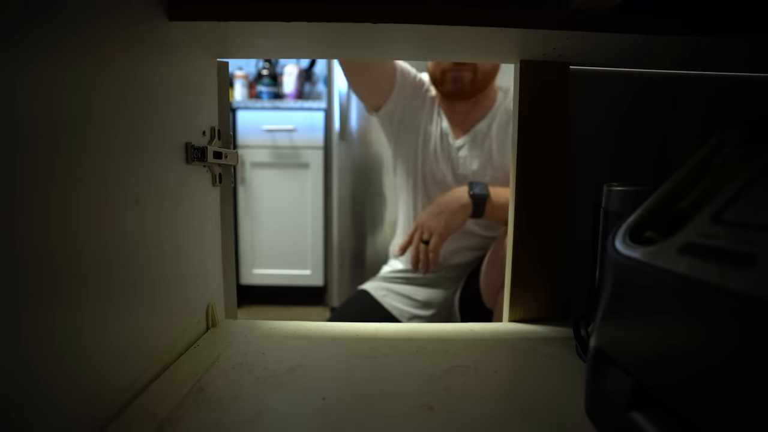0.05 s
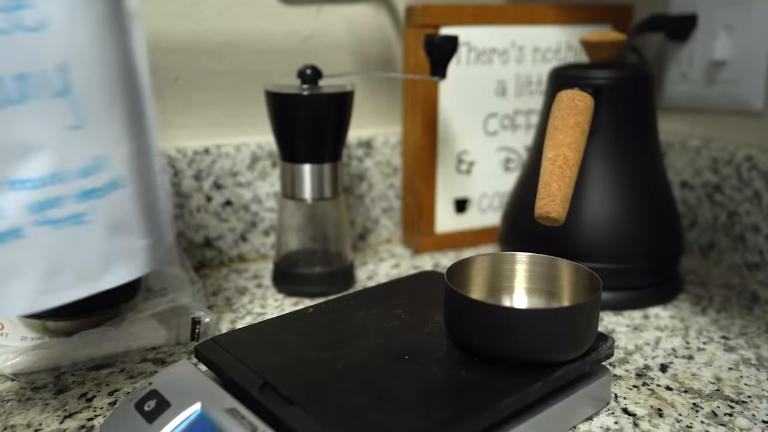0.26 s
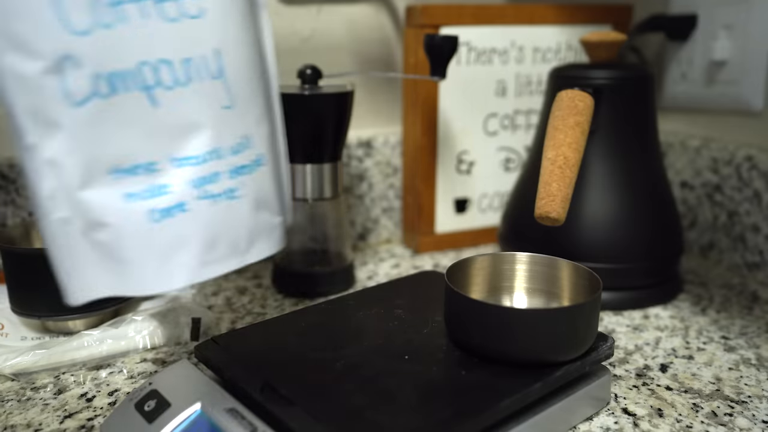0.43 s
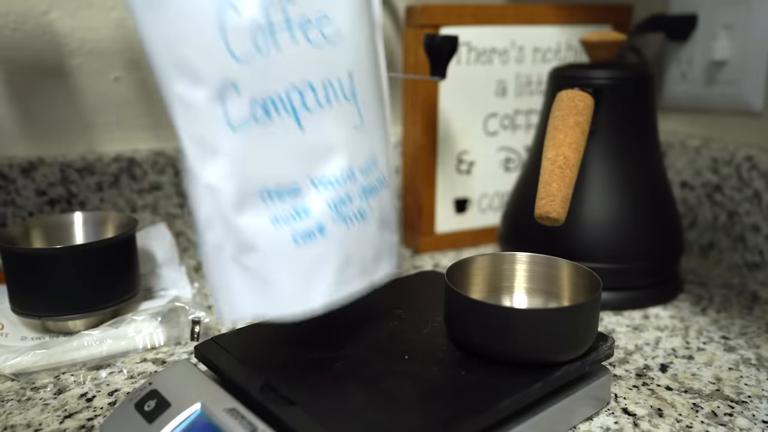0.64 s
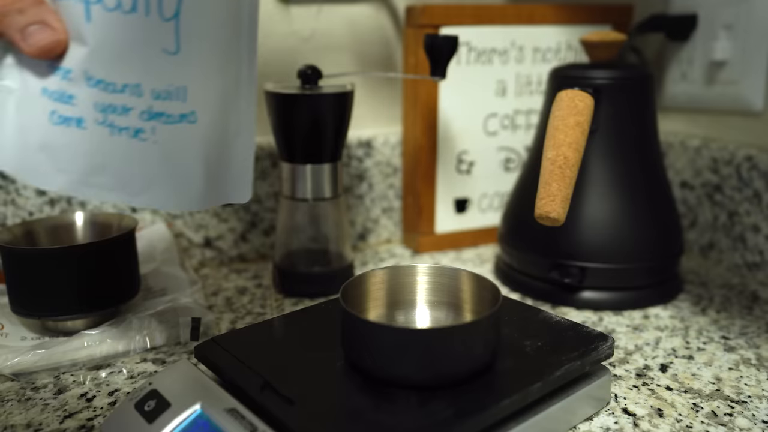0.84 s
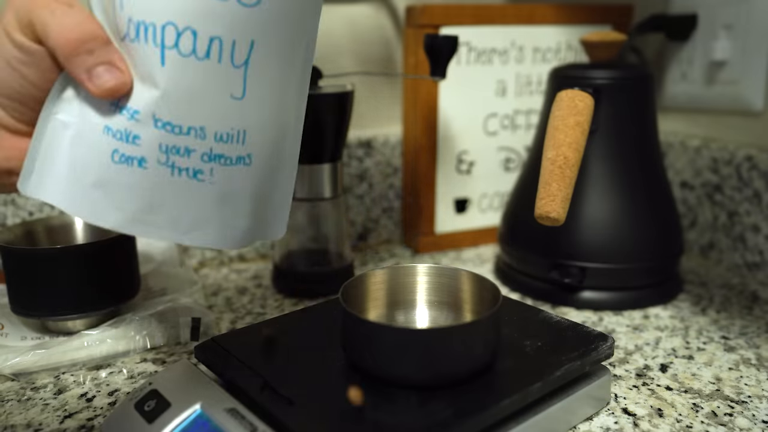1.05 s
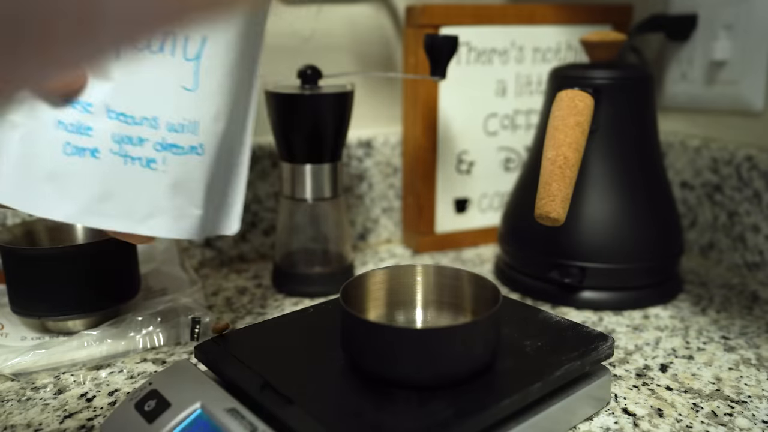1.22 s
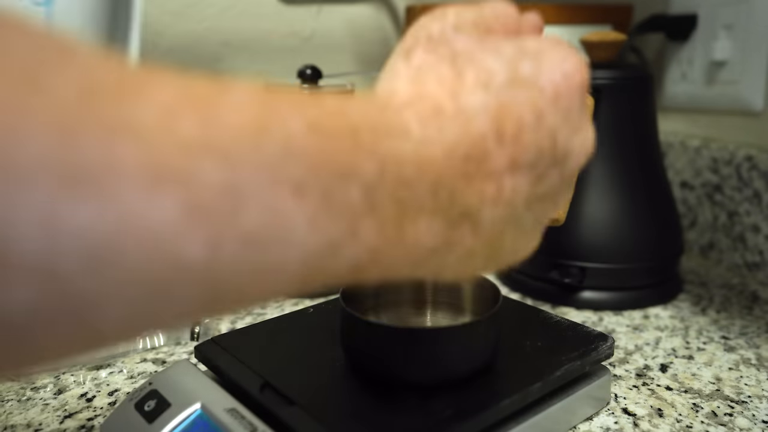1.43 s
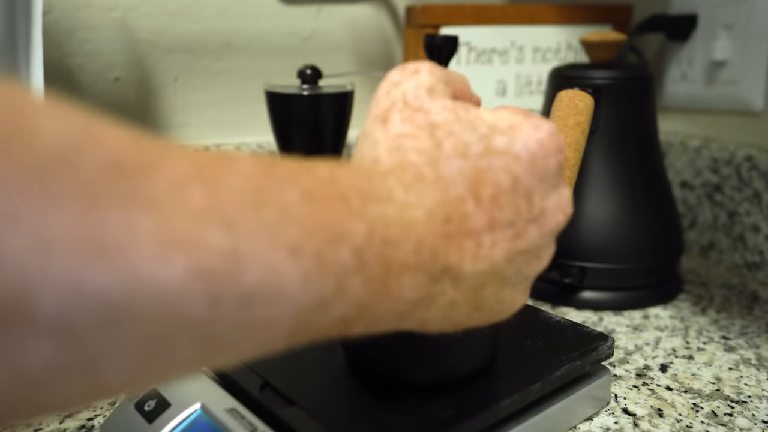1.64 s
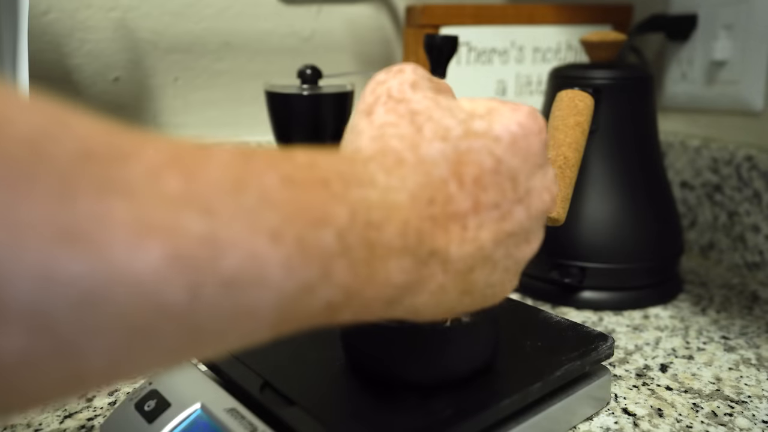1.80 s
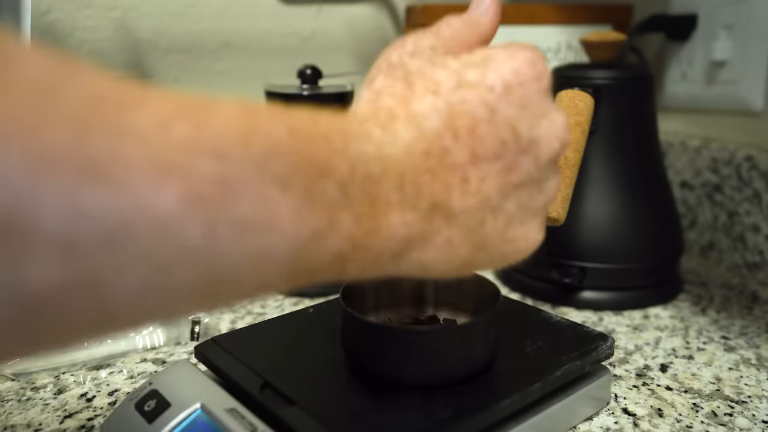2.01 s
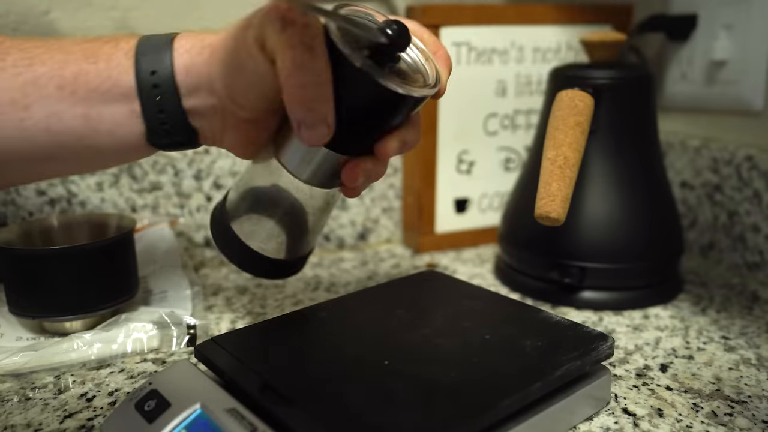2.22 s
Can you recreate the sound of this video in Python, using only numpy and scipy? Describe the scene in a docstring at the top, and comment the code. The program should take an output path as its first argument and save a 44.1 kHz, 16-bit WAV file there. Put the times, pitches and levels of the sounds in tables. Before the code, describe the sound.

Coffee beans rattle into a small steel cup on a kitchen scale, after a clatter and knock.

```python
"""A cupboard clatters first; soft taps follow, a paper bag rustles, and a knock brings low booms.
Coffee beans then drop singly into a small steel cup on a scale, a handful rattles in, and a hand grinder scrapes and squeaks.
Contacts are short noise bursts filtered to the colour of each object; the cup's wall and base also ring as fading sines.
The bag is a shower of tiny crackles, the booms and squeaks are sines, and the room is fading noise.
An appliance hum, a dull room noise and a low rumble lie underneath."""
import sys
import numpy as np
from scipy import signal
from scipy.fft import rfft, irfft, next_fast_len
from scipy.io import wavfile
from scipy.ndimage import uniform_filter1d, minimum_filter1d

SR = 44100
rng = np.random.default_rng(int(sys.argv[2]) if len(sys.argv) > 2 else 0)


def digitize_waveform(pressure):
    """Quantize a signal to 16-bit integers and store it at the path in sys.argv[1].

    Rows of a 2-D input are taken as channels; values are limited to [-1, 1].
    """
    field = np.atleast_2d(pressure).T
    bounded = np.clip(field, -1, 1)
    quanta = np.round(bounded * 32767).astype(np.int16)
    wavfile.write(sys.argv[1], SR, quanta)


N = 99974
TIME = np.arange(N) / SR  # seconds


def from_db(db):
    """Turn decibels into an amplitude factor."""
    return 10 ** (np.asarray(db) / 20)


def at_hz(points, hz):
    """Read a (frequency, value) table between its points, on a log-frequency axis."""
    table_hz, value = np.transpose(points)
    return np.interp(np.log(hz + 1), np.log(table_hz), value)


def level(curve):
    """Amplitude along a (time, level) curve, silent before its first point."""
    s, db = np.transpose(curve)
    return from_db(np.interp(TIME, s, db)) * (TIME >= s[0])


def colour(x, tone, peaks=()):
    """Filter with a given spectrum and resonances, without pre-echo; white noise keeps its power."""
    size = 2 * next_fast_len(N)
    hz = np.fft.rfftfreq(size, 1 / SR)
    lift_db = sum(db / (1 + (2 * (hz - f) / width) ** 2) for f, width, db in peaks)
    gain = from_db(at_hz(tone, hz) + lift_db)
    gain = gain / np.sqrt(np.mean(gain ** 2))
    # folding the cepstrum forward in time makes the filter respond only after its input
    cepstrum = irfft(np.log(gain))
    folded = np.r_[cepstrum[0], 2 * cepstrum[1:size // 2]]
    response = np.exp(rfft(folded, size))
    return irfft(rfft(x, size) * response)[:N]


LEVEL_WINDOW_S = 0.01  # a blow's level is its energy spread over this time


def blows(s, db):
    """Put the energy of each blow at its moment; times past the end move to the last sample."""
    at = np.clip(np.asarray(s) * SR, 0, N - 1).astype(int)
    return np.bincount(at, from_db(db) ** 2 * LEVEL_WINDOW_S * SR, N)


def grains(per_s, spread_db):
    """Energy of random tiny contacts of uneven size, with mean power 1."""
    happens = rng.random(N) < per_s / SR
    size_db = spread_db * np.clip(rng.standard_normal(N), -2, 2)
    energy = happens * from_db(size_db) ** 2
    return energy / energy.mean()


CONTACT_S, CONTACT_SHARE = 0.00013, 0.1  # decay of a crack's energy; its usual share of the total


def struck(energy, t60, crack_share=CONTACT_SHARE):
    """Each contact gives a sharp crack and a dense noisy ring that falls 60 dB in t60 seconds."""
    crack_decay = np.exp(-1 / (CONTACT_S * SR))
    ring_decay = np.exp(-2 * np.log(1000) / (t60 * SR))
    power = 0
    for share, decay in ((crack_share, crack_decay), (1 - crack_share, ring_decay)):
        power = power + share * signal.lfilter([1 - decay], [1, -decay], energy + 1e-18)
    return np.sqrt(power) * rng.choice([-1, 1], N)


def ring(clicks, hz, t60):
    """A resonator: a click of height 1 starts a fading sine of height 1."""
    decay = np.exp(-np.log(1000) / (t60 * SR))
    turn = 2 * np.pi * hz / SR
    return signal.lfilter([0, np.sin(turn)], [1, -2 * decay * np.cos(turn), decay * decay], clicks + 1e-18)


# Beans landing one by one:
# (time [s], thud of the cup on the scale [dB], click [dB], treble snap [dB])
BEAN_DROPS = [(0.976, -23, -13.5, -37), (1.0042, -31, -32, -30), (1.0378, -28, -20, -11.5),
              (1.073, -42.5, -50, -20.5), (1.0856, -39.5, -33.5, -28), (1.1320, -45, -58, -26),
              (1.1592, -38, -26.5, -18.5), (1.1977, -51, -25.5, -19), (1.2152, -54, -37, -29),
              (1.2206, -51, -46, -33), (1.239, -44, -30.5, -29), (1.2789, -46.5, -29, -28),
              (1.2971, -53, -32.5, -29.5), (1.3341, -64, -33, -30.5), (1.3437, -64, -48, -34),
              (1.3533, -69, -66, -40), (1.3788, -64, -47.5, -35.5), (1.3920, -62, -53, -34),
              (1.4539, -61.5, -60, -32.5), (1.4946, -69, -48, -34.5), (1.52, -58, -44.5, -40),
              (1.5399, -75, -50, -44), (1.567, -82, -60, -37), (1.5857, -82, -57, -35),
              (1.6012, -73, -66, -30), (1.6437, -56, -46.5, -39), (1.665, -47, -46, -39),
              (1.6941, -42, -22, -17), (1.7157, -30, -21, -16), (1.7438, -25, -18.5, -19),
              (1.7639, -43, -29, -15), (1.7823, -31.5, -44, -13.5), (1.7950, -37, -37, -11),
              (1.8367, -38, -36, -15), (1.8628, -39, -50, -19), (1.8700, -38, -40, -21),
              (1.8895, -33, -29, -17), (1.9314, -29.5, -37, -21), (1.9410, -40, -38, -23),
              (1.9532, -35.5, -28, -17), (2.0001, -36.5, -28, -32), (2.0382, -40.5, -55.5, -45),
              (2.0501, -46, -39, -23), (2.0590, -33, -27, -31), (2.0744, -33, -23, -19.5),
              (2.1055, -41, -32.5, -35), (2.1312, -35, -25, -20), (2.134, -38.5, -22.5, -15.5)]
# The handful streaming in, before each part's own offset: (time [s], level [dB])
STREAM_FLOW = [(1.745, -29.5), (1.775, -15), (1.80, -19), (1.845, -19), (1.87, -21), (1.945, -21),
               (1.97, -34.5), (2.03, -31.5), (2.07, -25.5), (2.10, -66), (2.17, -49), (2.26, -43)]
# Colours of the four parts of an impact: (frequency [Hz], relative level [dB])
THUD_TONE = [(200, -41), (500, -33.5), (610, -17), (700, 2), (780, 4.5), (950, -8), (1250, -11.5),
             (2000, -19), (4000, -55.5)]
CLACK_TONE = [(500, -37), (1100, -0.5), (2000, -2.5), (3000, 1.5), (4300, 0), (5500, -25), (9000, -34)]
CLICK_TONE = [(700, -28.5), (2000, -13.5), (4000, -7), (6000, -2), (7700, 2.5), (10000, 2), (12000, -4.5),
              (16000, -30)]
SNAP_TONE = [(3000, -51.5), (7000, -16), (10000, -10), (12000, -0.5), (14000, -0.5), (15500, -2.5),
             (17000, -10.5)]
# Resonances of the cup with beans in it: (frequency [Hz], width [Hz], lift [dB])
CUP_RESONANCES = [(1519, 40, 11), (2090, 270, 6), (3730, 58, 11), (4377, 310, 9.5), (5866, 170, 9),
                  (6430, 310, 9.5), (8770, 370, 4.5), (9200, 220, 3), (11840, 200, 3), (12000, 66, 7),
                  (13240, 69, 1), (13860, 160, 2), (15700, 230, 7.5)]
CLACK_OVER_THUD_DB = -0.5
STREAM_CONTACTS_PER_S, STREAM_SPREAD_DB = 550, 1.5
STREAM_T60_S, STREAM_CRACK_SHARE = 0.022, 0.5


def beans():
    """Beans strike the cup: its base thuds and clacks, the bean clicks and the steel snaps."""
    s, thud_db, click_db, snap_db = np.transpose(BEAN_DROPS)
    stream = grains(STREAM_CONTACTS_PER_S, STREAM_SPREAD_DB) * level(STREAM_FLOW) ** 2
    # single-bean level [dB], stream offset [dB], single-bean t60 [s], crack share of energy, tone
    parts = ((thud_db, -17.5, 0.035, 0.053, THUD_TONE),
             (thud_db + CLACK_OVER_THUD_DB, -14.5, 0.067, 0.056, CLACK_TONE),
             (click_db, -5, 0.032, 0.088, CLICK_TONE),
             (snap_db, 2.5, 0.034, 0.46, SNAP_TONE))
    out = 0
    for db, stream_db, t60, crack_share, tone in parts:
        single_beans = struck(blows(s, db), t60, crack_share)
        handful = from_db(stream_db) * struck(stream, STREAM_T60_S, STREAM_CRACK_SHARE)
        out = out + colour(single_beans + handful, tone, CUP_RESONANCES)
    return out


BASE_HZ, BASE_OVER_THUD_DB, BASE_T60_S = 766, -11.5, 0.17


def cup_base():
    """The cup's base rings low and briefly on the scale after every single-bean thud."""
    s, thud_db, _, _ = np.transpose(BEAN_DROPS)
    clicks = np.bincount((s * SR).astype(int), from_db(thud_db + BASE_OVER_THUD_DB), N)
    return ring(clicks, BASE_HZ, BASE_T60_S)


# Beans that catch the bare steel wall: (time [s], level [dB], favoured pitch [Hz])
WALL_STRIKES = [(1.0737, -34, 13800), (1.099, -17.5, 10500), (1.104, -15, 10700), (1.131, -10, 14000),
                (1.1983, -33, 14100), (1.2186, -24, 14500), (1.332, -53, 13600)]
# Ringing tones of the wall: (frequency [Hz], level added to the strike's [dB], t60 [s])
WALL_MODES = [(9561, -35, 0.22), (10700, -18, .03), (11060, -2, 0.037), (11490, -35, .3), (12000, -39, .35),
              (13000, -2, 0.078), (12500, 1, 0.085), (13250, 2, 0.12), (13327, -18, 0.11),
              (13700, -19, 0.41), (13500, -17, .06), (14900, -4, 0.16), (14600, -6, 0.088)]
FAVOUR_WIDTH_HZ = 1370


def cup_wall():
    """The nearly empty cup pings; each strike mainly wakes the wall tones near its favoured pitch."""
    s, db, favoured_hz = np.transpose(WALL_STRIKES)
    out = 0
    for hz, mode_db, t60 in WALL_MODES:
        favour = np.exp(-0.5 * ((hz - favoured_hz) / FAVOUR_WIDTH_HZ) ** 4)
        clicks = np.bincount((s * SR).astype(int), from_db(db + mode_db) * favour, N)
        out = out + ring(clicks, hz, t60)
    return out


# The grinder is touched as it is picked up: (time [s], level [dB])
GRINDER_CONTACTS = [(2.1505, -19.5), (2.199, -27.5), (2.226, -19)]
# Its scrape: (time [s], level [dB])
SCRAPE_LEVEL = [(2.15, -70), (2.176, -52), (2.188, -22.5), (2.205, -19.5), (2.235, -21.5), (2.267, -19.5)]
# Colours of scrape and bump: (frequency [Hz], relative level [dB])
GRINDER_TONE = [(150, -26.5), (400, -11), (800, -7.5), (1250, -0.5), (1600, -3.5), (2300, -6.5), (2800, -2),
                (4300, -2), (6000, -4.5), (10000, -11), (15500, -11.5)]
GRINDER_BUMP_TONE = [(100, -18), (360, 0), (650, -5), (1100, -11), (2000, -16), (6000, -35)]
# Resonances of the grinder: (frequency [Hz], width [Hz], lift [dB])
GRINDER_RESONANCES = [(1230, 140, 5.5), (1890, 200, 7), (2640, 250, 4), (3620, 400, 4.5), (4250, 310, 2.5)]
# One curve for each stick-slip squeak: (time [s], frequency [Hz], level of the lower tone [dB])
SQUEAK_CURVES = [
    [(2.235, 1087, -42), (2.243, 1148, -31), (2.249, 1260, -16), (2.254, 1270, -32), (2.267, 1475, -23)],
    [(2.25, 4670, -41), (2.255, 4980, -18.5), (2.259, 5320, -23), (2.261, 4930, -12), (2.267, 5340, -14)],
]
SCRAPE_GRAINS_PER_S, SCRAPE_SPREAD_DB = 2200, 2
SQUEAK_OCTAVE_DB = -6.5  # relative to the lower tone


def grinder():
    """A few contacts and a gritty scrape of many tiny contacts, which catches into squeaks."""
    grit = grains(SCRAPE_GRAINS_PER_S, SCRAPE_SPREAD_DB) * level(SCRAPE_LEVEL) ** 2
    energy = blows(*np.transpose(GRINDER_CONTACTS)) + grit
    scrape = colour(struck(energy, t60=0.021), GRINDER_TONE, GRINDER_RESONANCES)
    # 2.4 s is past the end, so only the first instant of this bump sounds, in the last sample
    bump = colour(struck(blows([2.4], [-20]), t60=0.046), GRINDER_BUMP_TONE)
    return scrape + bump + sum(squeak(curve) for curve in SQUEAK_CURVES)


def squeak(curve):
    """Sticking and slipping makes a gliding tone, here a sine with its octave."""
    s, hz, db = np.transpose(curve)
    phase = 2 * np.pi * np.cumsum(np.interp(TIME, s, hz)) / SR
    tone = np.sin(phase) + from_db(SQUEAK_OCTAVE_DB) * np.sin(2 * phase)
    return level(np.c_[s, db]) * tone


# The knock and its rebounds: (time [s], dull part [dB], bright part [dB])
KNOCK_BLOWS = [(0.7917, -13.5, -23.5), (0.8016, -16, -19.5), (0.8083, -40, -19), (0.813, -47, -27.5)]
# Colours of the two parts: (frequency [Hz], relative level [dB])
KNOCK_DULL_TONE = [(60, -12.5), (160, -16), (420, -3.5), (700, 0.5), (900, -6.5), (1200, -7.5),
                   (1600, -12.5), (2200, -4), (2900, -15), (6000, -24)]
KNOCK_BRIGHT_TONE = [(300, -27), (1150, 0.5), (1700, -2.5), (4200, -1), (5500, -5.5), (10000, -8.5),
                     (15500, -15.5)]
# Resonances of what is knocked: (frequency [Hz], width [Hz], lift [dB])
KNOCK_RESONANCES = [(703, 100, 6), (1170, 89, 7), (1850, 250, 4.5)]
KNOCK_T60_S = 0.047


def knock():
    """Something is set down: a heavy contact with quick, brighter rebounds."""
    s, dull_db, bright_db = np.transpose(KNOCK_BLOWS)
    dull = colour(struck(blows(s, dull_db), KNOCK_T60_S), KNOCK_DULL_TONE, KNOCK_RESONANCES)
    bright = colour(struck(blows(s, bright_db), KNOCK_T60_S), KNOCK_BRIGHT_TONE)
    return dull + bright


# Low booms: (peak time [s], frequency [Hz], peak level [dB], rise [s], t60 [s])
LOW_BOOMS = [(.095, 36, -38, 0.037, 0.21), (0.854, 64.5, -21.5, 0.035, .22),
             (.85, 39.3, -25.5, 0.014, 0.44)]


def booms():
    """Low tones swell after knocks and handling, then die away."""
    out = 0
    for s, hz, db, rise, t60 in LOW_BOOMS:
        t = TIME - s
        swell = -(np.minimum(t, 0) / rise) ** 2
        fade = -np.log(1000) * np.maximum(t, 0) / t60
        out = out + from_db(db) * np.exp(swell + fade) * np.sin(2 * np.pi * hz * t)
    return out


# Blows of the cupboard: (time [s], level [dB])
CLATTER_BLOWS = [(.001, -23), (.007, -25), (0.013, -27.5), (0.018, -16), (0.023, -17), (0.0252, -22),
                 (0.031, -25), (.045, -33)]
# Its colour: (frequency [Hz], relative level [dB])
CUPBOARD_TONE = [(100, -25.5), (400, -18.5), (540, -4), (720, 2), (900, -4), (1200, 4.5), (2200, -1),
                 (4000, 2), (5000, -8.5), (8000, -3.5), (9500, -7.5), (15500, -6)]


def cupboard_clatter():
    """A quick run of blows, each a crack with a short noisy ring."""
    return colour(struck(blows(*np.transpose(CLATTER_BLOWS)), t60=0.076), CUPBOARD_TONE)


# Soft handling taps: (time [s], level [dB])
HANDLING_TAPS = [(.2565, -46.5), (.3695, -37), (.526, -45), (.596, -51)]
# Their colour: (frequency [Hz], relative level [dB])
HANDLING_TONE = [(300, -34), (800, -4), (1300, 8), (1650, -11.5), (2100, -3), (2800, -17), (6000, -34),
                 (15000, -41)]
# Their resonances: (frequency [Hz], width [Hz], lift [dB])
TAP_RESONANCES = [(1320, 350, 4.5), (1940, 340, 7)]


def handling_taps():
    """Soft contacts, each a small burst shaped by two resonances."""
    return colour(struck(blows(*np.transpose(HANDLING_TAPS)), t60=0.043), HANDLING_TONE, TAP_RESONANCES)


# Loudness of the rustle: (time [s], level [dB])
BAG_LEVEL = [(.65, -84), (.665, -58.5), (.68, -60), (.686, -41.5), (.70, -50.5), (.73, -50.5), (.77, -57.5),
             (.83, -60), (.96, -40), (1.1, -46), (1.3, -44.5), (1.45, -55), (1.61, -47.5), (1.67, -44),
             (1.75, -36.5)]
# Its colour: (frequency [Hz], relative level [dB])
PAPER_TONE = [(300, -5), (1000, -5.5), (4000, 1.5), (8000, 1.5), (15500, 0)]
BAG_CRACKLES_PER_S, BAG_SPREAD_DB, BAG_T60_S = 980, 4.5, 0.032


def paper_bag():
    """Paper rustles as a dense shower of random crackles of uneven size."""
    crackles = struck(grains(BAG_CRACKLES_PER_S, BAG_SPREAD_DB), BAG_T60_S)
    return colour(crackles, PAPER_TONE) * level(BAG_LEVEL)


# How long the room rings: (frequency [Hz], t60 [s])
ROOM_DECAY = [(100, 0.52), (700, 0.51), (3000, 0.54), (7000, .45), (14000, 0.19)]
ROOM_BUILD_S = 0.0039


def room(x):
    """Kitchen echo as noise: each band's energy builds up and dies away, the high treble fastest."""
    out = 0
    build = np.exp(-1 / (ROOM_BUILD_S * SR))
    edges = np.geomspace(150, 17000, 19)  # Hz
    for low, high in zip(edges, edges[1:]):
        band = signal.butter(2, [low, high], "band", fs=SR, output="sos")
        t60 = at_hz(ROOM_DECAY, np.sqrt(low * high))
        decay = np.exp(-2 * np.log(1000) / (t60 * SR))
        energy = signal.sosfilt(band, x) ** 2 + 1e-18
        power = signal.lfilter([(1 - decay) * (1 - build)], np.poly([decay, build]), energy)
        wash = signal.sosfilt(band, rng.standard_normal(N))
        out = out + np.sqrt(np.abs(power)) * wash / wash.std()
    return out


# Appliance hum: (frequency [Hz], RMS level [dB])
HUM_TONES = [(120, -50.5), (167, -59), (280, -68), (334, -66.5)]
# Rumble of the counter after the knock and during handling: (time [s], level [dB])
RUMBLE_LEVEL = [(.79, -66), (.83, -39), (.90, -44.5), (1.02, -42.5), (1.07, -61), (1.85, -66), (2.0, -52),
                (2.18, -49), (2.24, -42)]
# Colours of the rumble and the room noise: (frequency [Hz], relative level [dB])
RUMBLE_COLOUR = [(20, -19), (45, 3), (90, 3.5), (160, -2.5), (300, -8.5), (480, -18.5), (700, -4),
                 (2000, -33)]
FLOOR_TONE = [(20, -8), (45, 1), (90, 4.5), (200, -7), (350, -8.5), (600, -17.5), (1500, -24.5),
              (4000, -36), (15000, -38.5)]
FLOOR_DB = -50.5


def background():
    """Steady hum sines over dull filtered noise, plus low noise that follows the rumble curve."""
    hum = 0
    for hz, db in HUM_TONES:
        hum = hum + from_db(db) * np.sqrt(2) * np.sin(2 * np.pi * (hz * TIME + rng.random()))
    rumble = level(RUMBLE_LEVEL) * colour(rng.standard_normal(N), RUMBLE_COLOUR)
    room_noise = from_db(FLOOR_DB) * colour(rng.standard_normal(N), FLOOR_TONE)
    return hum + rumble + room_noise


def scene():
    """Add all sources; the struck and scraped ones also feed the room, each by its own amount."""
    cup = beans() + cup_wall() + cup_base()
    # sound, level sent to the room [dB]
    sources = ((cup, -14.5), (grinder(), -10), (knock(), -8.5),
               (cupboard_clatter(), -3), (handling_taps(), -32))
    direct = sum(x for x, _ in sources)
    echo = room(sum(from_db(db) * x for x, db in sources))
    return (direct + echo + paper_bag() + booms() + background())[None]


CEILING, LIMITER_S, CUTOFF_HZ = 1, 0.0008, 15800  # ceiling is an amplitude


def record(dry):
    """A fast limiter holds the peaks down, then a steep filter cuts the top."""
    span = int(LIMITER_S * SR)
    needed_gain = CEILING / np.maximum(np.abs(dry), CEILING)
    gain = uniform_filter1d(minimum_filter1d(needed_gain, 2 * span), span)
    low_pass = signal.ellip(12, 0.2, 80, CUTOFF_HZ, fs=SR, output="sos")
    return signal.sosfilt(low_pass, dry * gain)


dry = scene()
out = record(dry)
digitize_waveform(out)
```